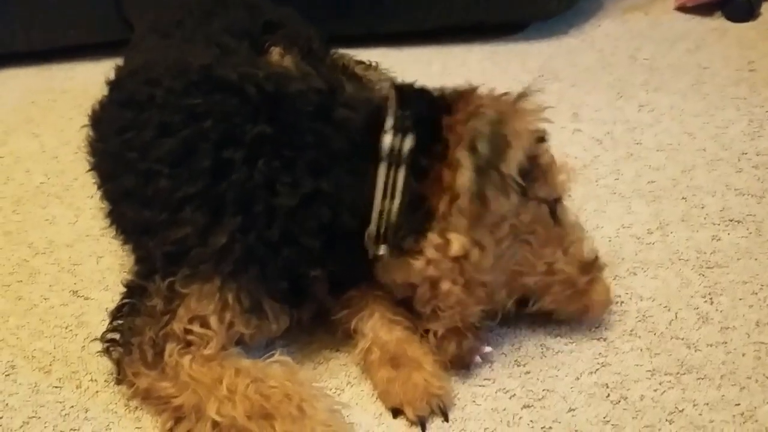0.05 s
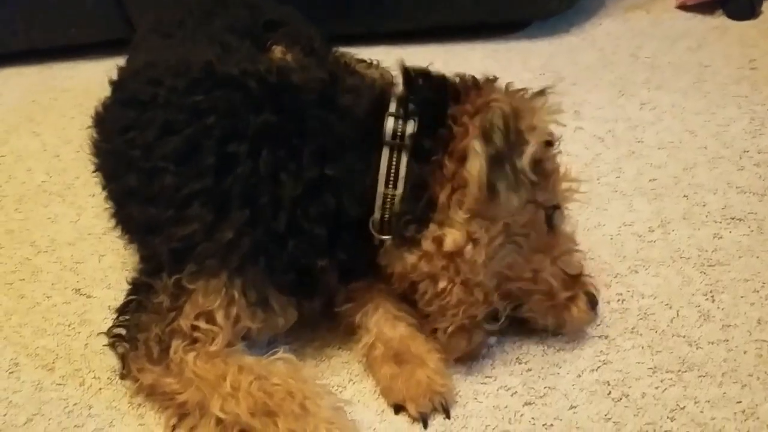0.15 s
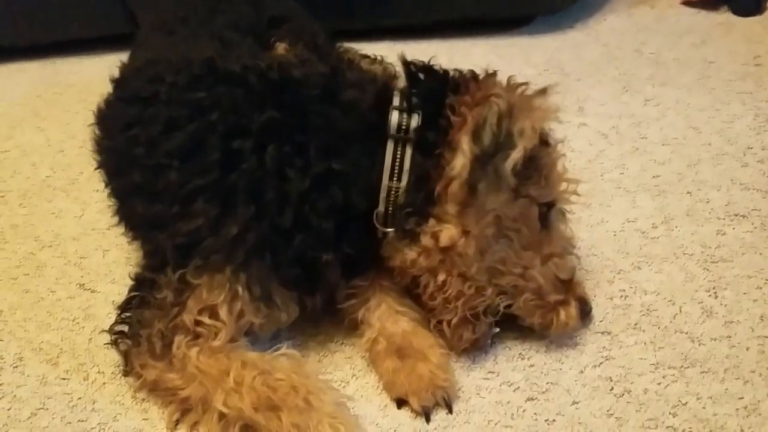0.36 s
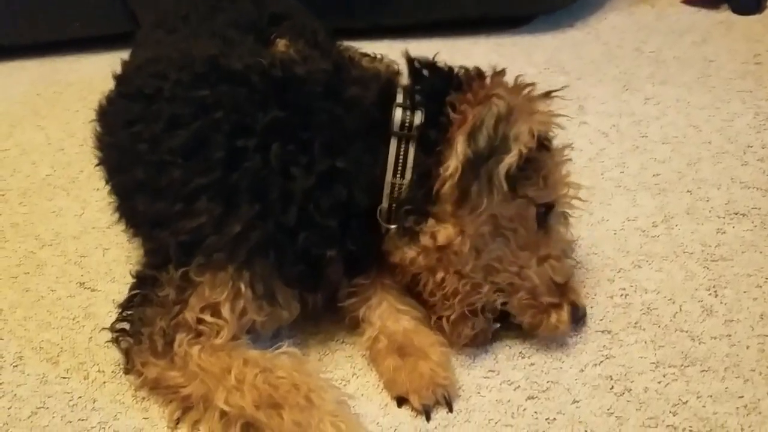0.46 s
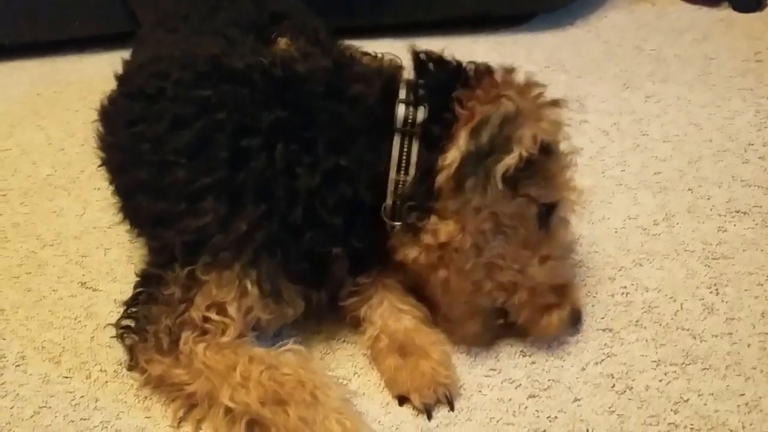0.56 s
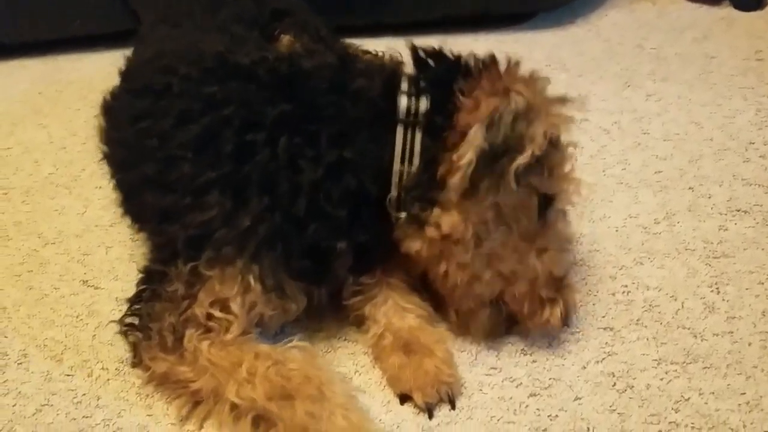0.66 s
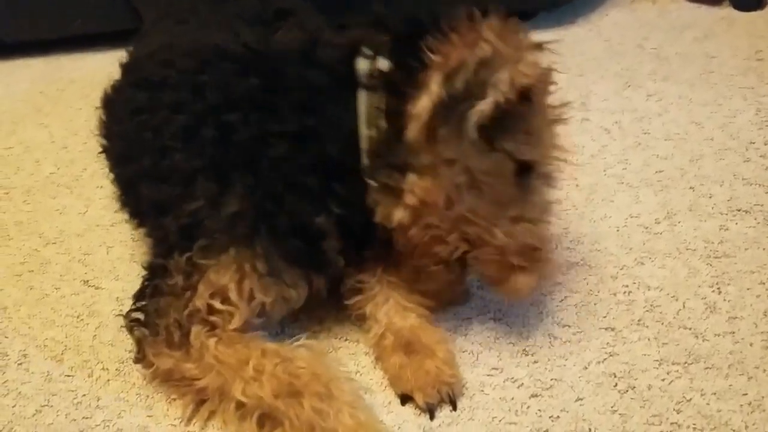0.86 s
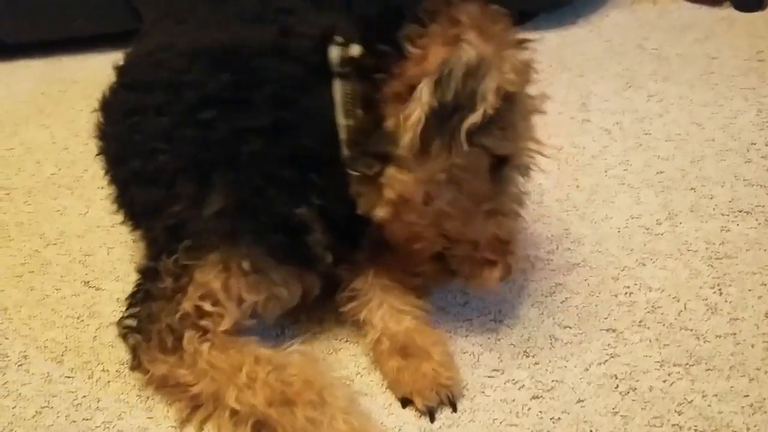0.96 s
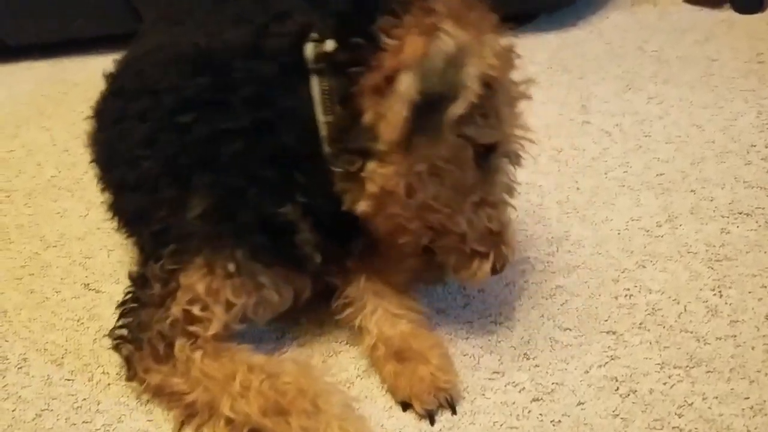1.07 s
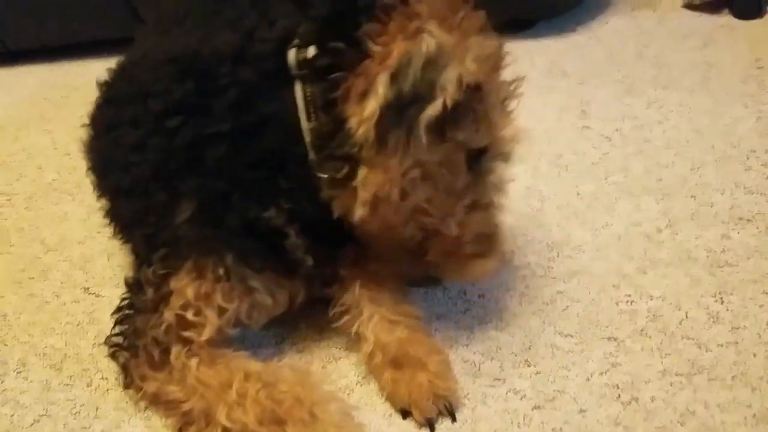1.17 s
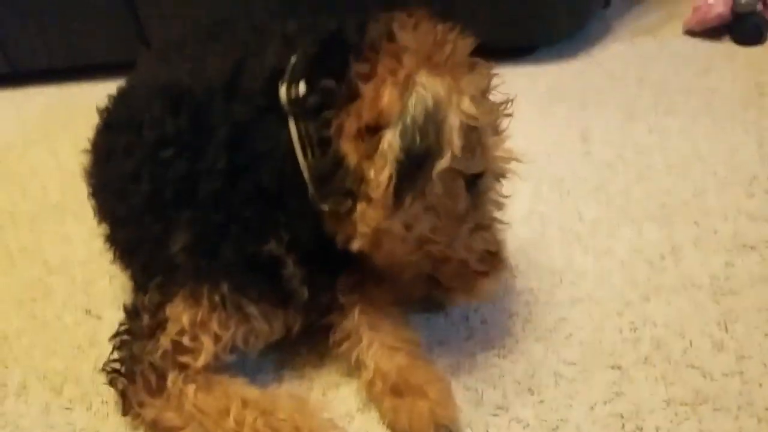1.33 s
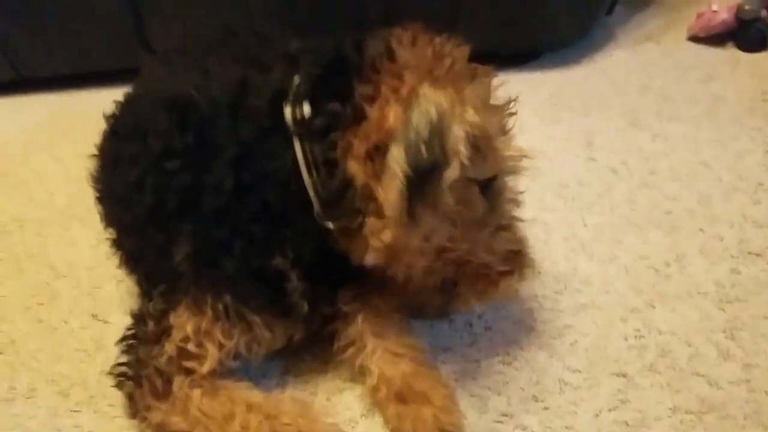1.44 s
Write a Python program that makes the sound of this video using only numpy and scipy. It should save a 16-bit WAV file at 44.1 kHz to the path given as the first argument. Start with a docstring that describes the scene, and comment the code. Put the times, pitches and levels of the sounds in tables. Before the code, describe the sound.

Dog chewing bone up close: rapid knocks and crunches, a sharp crack, then quiet mouthing

```python
"""A dog gnaws a large bone on a carpet, close to the microphone in a living room with a quiet tone.
Small wet clicks, cavity pops and swelling bands of noise (ticks, soft brushing) come first and return late.
Teeth drag and catch: damped modes knock jaw and bone, noise bursts crush it, short wavering tones squeak.
Low damped pushes with noise puffs bump on the carpet from early on and after the crack.
At half a second comes that one hard crack with a few gritty snaps; then the dog mouths the bone quietly."""
import sys
import numpy as np
from scipy import signal
from scipy.fft import rfft, irfft, next_fast_len
from scipy.io import wavfile
from scipy.ndimage import uniform_filter1d

SR = 44100
rng = np.random.default_rng(int(sys.argv[2]) if len(sys.argv) > 2 else 0)


def output_pcm(signal):
    """Save a mono or channel-first signal as 16-bit PCM at the path in sys.argv[1].

    Samples are clipped to [-1, 1] before scaling.
    """
    pcm = np.clip(np.atleast_2d(signal).T, -1, 1) * 32767
    wavfile.write(sys.argv[1], SR, np.round(pcm).astype(np.int16))


N = 66150  # 1.5 s

# In all spectra the levels shape the colour only: the noise is then scaled to rms 1.
# Room tone: (frequency [Hz], relative level [dB per Hz])
AIR_SPECTRUM = [(15, -31), (35, -42), (60, -16), (115, 1.5), (180, -11), (300, -10.5), (550, -17.5),
                (900, -16), (2000, -17.5), (7000, -30), (11000, -28.5), (15500, -25)]
AIR_DB = -66.5
# Left-right likeness of diffuse sound: (frequency [Hz], correlation [-1 to 1])
STEREO_LIKENESS = [(50, 0.96), (250, 0.78), (600, 0.22), (1500, 0.028), (12000, 0.017)]
# Decay of the room: (frequency [Hz], t60 [s])
ROOM_DECAY = [(100, 0.86), (400, 0.26), (1500, 0.32), (4000, 0.28), (14000, 0.047)]
# Strength of the room's answer: (frequency [Hz], level against the direct sound [dB])
ROOM_LEVEL = [(80, -25), (300, -13), (900, -4), (3000, -3.5), (7000, -6), (14000, -8.5)]
ROOM_BUILD_S = 0.00057  # time constant of the room's onset

# The dog shifting its weight: (time [s], level before panning [dB])
SHIFT_LEVEL = [(0, -73), (.15, -63.5), (.28, -56), (.4, -72), (.5, -60), (.58, -47.5), (.66, -54.5),
               (.73, -71), (1.5, -75.5)]
# Low rumble of that weight: (frequency [Hz], relative level [dB per Hz])
RUMBLE_SPECTRUM = [(22, -59), (31, -5), (41, 6.5), (52, -5.5), (64, 7.5), (85, -1.5), (150, -14),
                   (400, -45.5)]

# Bone and paw bumping on the carpet: (time [s], level before muffling and panning [dB], pitch [Hz])
BUMPS = [(.112, -49, 208), (0.158, -63, 155), (0.234, -46.5, 131), (0.267, -54.5, 71), (0.296, -50, 123),
         (0.325, -51, 68), (0.504, -40, 198), (0.575, -43.5, 149), (.587, -50.5, 75.5), (0.609, -56, 113),
         (.653, -44.5, 97.3), (1.399, -54, 140)]
# Dull puff of each bump: (frequency [Hz], relative level [dB per Hz])
PUFF_SPECTRUM = [(40, -6), (130, 5.5), (400, 1), (700, -12), (1500, -32)]
BUMP_T60_S, BUMP_RISE_S, BUMP_PUFF_DB = 0.026, 0.00031, -0.5  # puff level against the push
CARPET_HZ = 540  # the pile muffles more and more from here up

# Short ticks, a late knock's noise and soft brushing:
# (time [s], length [s], level before the swell [dB], centre [Hz], width [octaves])
NOISE_SWELLS = [(0.03, 0.0055, -51.5, 1870, 1.16), (0.64, 0.04, -66, 1650, 0.86),
                (0.873, 0.018, -65, 1120, 0.8), (0.937, 0.023, -64.5, 5470, 1.2),
                (1.06, 0.0056, -60.5, 11000, 0.86), (1.3977, 0.006, -54.5, 2220, 0.58),
                (1.405, 0.11, -67.5, 1190, 1.37), (1.387, 0.063, -66.5, 12400, 0.75)]
# Lip and tongue smacks: (time [s], click level [dB], cavity pop level [dB], cavity pitch [Hz])
SMACKS = [(0.08, -61.5, -54, 245), (0.875, -64.5, -63, 336), (.930, -66, -60.5, 326),
          (1.139, -67.5, -65.5, 794), (1.142, -69, -57.5, 266), (1.3969, -64, -54.5, 567)]
# Wet click: (frequency [Hz], relative level [dB per Hz])
SMACK_SPECTRUM = [(300, -2), (1200, 9), (2500, -18), (4200, -5.5), (6000, -14.5), (8000, -24),
                  (13000, -1.5), (16000, -28.5)]
SMACK_T60_S, POP_T60_S = 0.02, 0.014

# Teeth dragging between catches: (time [s], level before panning [dB])
DRAG_LEVEL = [(0, -66.5), (.06, -63), (.1, -56.5), (.135, -73), (.2, -56), (.26, -55.5), (.35, -55.5),
              (.41, -51.5), (.45, -48), (.495, -63), (.535, -42), (.6, -66.5), (.7, -73), (.9, -66.5),
              (1.15, -66.5), (1.38, -74), (1.42, -64), (1.5, -63.5)]
# Scrape of the teeth: (frequency [Hz], relative level [dB per Hz])
SCRAPE_SPECTRUM = [(60, 9.5), (200, 12.5), (420, 6.5), (650, 5.5), (950, -9.5), (1600, -15), (3800, -44),
                   (5000, -13.5), (8000, -44), (12000, -9), (16000, -57)]
SLIPS_PER_S, DRAG_ROUGH_DB = 450, 5  # rate and depth of the random gain steps

# Enamel squeaking briefly over the bone: (time [s], level [dB], pitch [Hz])
SQUEAKS = [(.109, -67, 3730), (.146, -64.5, 3670), (.155, -65.5, 3590), (.226, -58, 2344),
           (.2275, -64.5, 3840), (.364, -57.5, 3680), (.3875, -59, 2670), (.4045, -58, 2600)]
SQUEAK_S, SQUEAK_WAVER = 0.0069, 0.045  # length, rms waver as a share of the pitch

# Splinters breaking off after the hard crack: (time [s], level [dB])
SPLINTERS = [(0.5061, -46), (0.5099, -44.5), (.516, -42.5), (.536, -62)]
# Snap of a splinter: (frequency [Hz], relative level [dB per Hz])
SPLINTER_SPECTRUM = [(400, 14), (1100, 10.5), (1700, 12.5), (2600, -4.5), (3900, 2), (6000, -7), (9000, -4),
                     (12500, 3.5), (16000, 4)]
SPLINTER_T60_S = 0.0086

# Tooth catches, each level before its trim and panning: (time [s], crunch level [dB],
# jaw knock level [dB], bone knock level [dB], grit level [dB], jaw pitch [Hz], bone pitch [Hz],
# crunch and grit t60 [s])
BITES = [(0.0853, -56.5, -46, -45, -57, 288, 463, 0.015), (0.1091, -50, -45, -62, -56, 357, 850, 0.037),
         (0.148, -40, -53, -66, -53.5, 422, 1540, 0.013), (.157, -50, -48, -62, -58, 230, 1460, 0.03),
         (0.218, -45.5, -50.5, -54, -56.5, 270, 1090, 0.016),
         (0.2294, -43.5, -41.5, -43.5, -48.5, 446, 860, 0.015),
         (0.2889, -47.5, -44, -40.5, -49.5, 266, 852, 0.023),
         (0.3242, -45.5, -48, -43, -46.5, 316, 890, 0.013), (0.3645, -33, -43, -36.5, -51, 437, 912, 0.017),
         (.3688, -33.5, -43.5, -44, -69, 415, 650, .012), (.390, -38, -37.5, -47, -46.5, 432, 910, 0.03),
         (0.3952, -41, -41, -35, -45, 378, 880, 0.022), (0.406, -36.5, -34.5, -40, -46.5, 400, 880, 0.025),
         (0.4283, -34, -42, -39, -47.5, 394, 920, 0.011), (0.433, -35, -34.5, -35.5, -49, 397, 833, 0.028),
         (0.4424, -42, -41, -46.5, -51.5, 457, 1113, 0.016), (.449, -57, -50, -59, -53, 426, 1110, .013),
         (0.5012, -22.5, -26.5, -28, -35.5, 436, 761, 0.0099)]
# Upper modes of the bone, damped by lips and paws, before a small random spread:
# (frequency [Hz], level against the main mode [dB], t60 [s])
BONE_MODES = [(1237, -14.5, 0.0074), (2460, -19, 0.0067), (3820, -21.5, 0.012)]
# Bright part of crushed bone: (frequency [Hz], relative level [dB per Hz])
CRUNCH_SPECTRUM = [(3000, -8), (7000, -18), (8200, -4.5), (9300, -9), (11000, -1.5), (13000, 1), (15000, 1),
                   (16500, -46)]
# Darker part of crushed bone: (frequency [Hz], relative level [dB per Hz])
GRIT_SPECTRUM = [(300, -0.5), (1000, 15), (1700, 3), (2400, 5), (3100, -2.5), (3900, -6.5), (4600, -7.5),
                 (5800, -3), (7000, -16), (12000, -44)]
JAW_TRIM_DB, BONE_TRIM_DB, CRUNCH_TRIM_DB, GRIT_TRIM_DB = -2.5, -7.5, -13.5, -5
KNOCK_RISE_S, JAW_T60_S, BONE_T60_S = 0.0025, 0.016, 0.012
FRACTURES_PER_S, CRUNCH_ROUGH_DB = 1893, 7  # rate and depth of the random gain steps
CRUNCH_RISE = 0.25  # rise over t60: a slow crumble starts softly, a hard crack at once

# Left over right
JAW_PAN_DB, BONE_PAN_DB, CRUNCH_PAN_DB, GRIT_PAN_DB, DRAG_PAN_DB = 3.5, 11.5, 1.5, -6, 2.5
TOP_HZ, SOFT_TOP_HZ = 16800, 15850  # upper band limits of the whole mix and of the soft layers
T = np.arange(SR // 8) / SR  # clock of a short sound [s]


def amp(db):
    """Decibels to gain."""
    return 10 ** (np.asarray(db) / 20)


def unit(x):
    """Scale to rms 1."""
    return x / np.sqrt(np.mean(x ** 2) + 1e-20)


def blow(x):
    """Scale a short sound to the energy of 10 ms at rms 1."""
    return unit(x) * np.sqrt(.01 * SR / x.shape[-1])


def along(points, hz):
    """Read (frequency [Hz], value) points on a log frequency axis."""
    f, v = np.transpose(points)
    return np.interp(np.log(hz + 1), np.log(f + 1), v)


def level(points):
    """Gain per sample from (time [s], level [dB]) points."""
    return amp(np.interp(np.arange(N) / SR, *np.transpose(points)))


def pan(db):
    """Left and right gains, db apart."""
    return amp(np.array([[db], [-db]]) / 2)


def filtered(x, response):
    """Shape x with a gain that depends on frequency."""
    n = x.shape[-1]
    m = next_fast_len(n + 8192)
    spectrum = rfft(x, m) * response(np.fft.rfftfreq(m, 1 / SR))
    return irfft(spectrum, m)[..., :n]


def noise(spectrum, size):
    """Coloured stereo noise of rms 1, most alike left and right in the bass."""
    def mid_side_gain(hz):
        angle = np.arccos(np.clip(along(STEREO_LIKENESS, hz), -1, 1)) / 2
        return amp(along(spectrum, hz)) * [np.cos(angle), np.sin(angle)]

    mid, side = filtered(rng.standard_normal((2, size)), mid_side_gain)
    return unit(np.array([mid + side, mid - side]))


def fade(rise, t60):
    """Quick rise, exponential decay."""
    return (1 - np.exp(-T / rise)) * np.exp(-np.log(1000) * T / t60)


def ring(hz, rise, t60):
    """One damped mode of a struck body."""
    return np.sin(2 * np.pi * hz * T) * fade(rise, t60)


def grain(rate, depth_db, size):
    """A jagged random gain of rms 1."""
    knots = np.sqrt(3) * rng.uniform(-1, 1, size)  # rms 1
    steps = np.interp(np.arange(size) * rate / SR, np.arange(size), knots)
    return unit(amp(depth_db * steps))


def burst(spectrum, t60):
    """A dying cluster of tiny fractures: coloured noise with a jagged gain."""
    dying = noise(spectrum, len(T)) * fade(CRUNCH_RISE * t60, t60)
    return blow(dying * grain(FRACTURES_PER_S, CRUNCH_ROUGH_DB, len(T)))


def add(out, s, x):
    """Mix x in at time s."""
    part = out[:, max(round(s * SR), 0):][:, :x.shape[-1]]
    part += x[..., :part.shape[1]]


def in_room(x):
    """A short sound followed by the room's answer: noise whose decay depends on frequency."""
    flat_noise = noise([(20, 0), (20000, 0)], SR // 2)
    hz, t, bands = signal.stft(flat_noise, SR, nperseg=256)
    t60 = along(ROOM_DECAY, hz)[:, None]
    shape = np.exp(-np.log(1000) * t / t60) * (1 - np.exp(-t / ROOM_BUILD_S))
    # even energy in every band, so that ROOM_LEVEL alone sets the strength
    shape = shape / np.sqrt(np.mean(shape ** 2, axis=1, keepdims=True) * SR / 2)
    wet = amp(along(ROOM_LEVEL, hz))[:, None]
    response = signal.istft(bands * shape * wet, SR, nperseg=256)[1]
    response[:, 0] += 1  # the direct sound
    return signal.fftconvolve(x * np.ones((2, 1)), response, axes=1)


def room_tone():
    """Steady, quiet noise of the air in the room."""
    return amp(AIR_DB) * noise(AIR_SPECTRUM, N)


def weight_shifts():
    """The dog shifts on the floor: low noise rises and falls with its weight."""
    return level(SHIFT_LEVEL) * noise(RUMBLE_SPECTRUM, N) * pan(DRAG_PAN_DB)


def carpet_bumps():
    """Each bump is a low damped push and a dull puff, muffled by the carpet."""
    out = np.zeros((2, N))
    for s, db, hz in BUMPS:
        push = blow(ring(hz, BUMP_RISE_S, BUMP_T60_S))
        puff = amp(BUMP_PUFF_DB) * burst(PUFF_SPECTRUM, BUMP_T60_S)
        muffled = filtered(push + puff, lambda f: 1 / np.sqrt(1 + (f / CARPET_HZ) ** 6))
        add(out, s, in_room(amp(db) * muffled * pan(JAW_PAN_DB)))
    return out


def noise_swells():
    """Short ticks, a late knock's noise and soft brushing: swelling bands of grainy noise."""
    out = np.zeros((2, N))
    t = np.arange(SR // 4) / SR
    for s, length, db, hz, octaves in NOISE_SWELLS:
        hiss = noise([(20, 0.0033), (20000, 0.0038)], len(t))  # practically flat
        band = filtered(hiss, lambda f: np.exp(-.5 * (np.log2((f + 1) / hz) / octaves) ** 2))
        swell = np.sin(np.pi * np.minimum(t / length, 1))
        grainy = unit(band) * swell * grain(SLIPS_PER_S, DRAG_ROUGH_DB, len(t))
        add(out, s, in_room(amp(db) * grainy))
    return out


def smacks():
    """Lips and tongue part with a wet noise click and a damped pop of the mouth cavity."""
    out = np.zeros((2, N))
    for s, click_db, pop_db, hz in SMACKS:
        click = amp(click_db) * burst(SMACK_SPECTRUM, SMACK_T60_S)
        pop = amp(pop_db) * blow(ring(hz, KNOCK_RISE_S, POP_T60_S))
        add(out, s, in_room(click + pop))
    return out


def tooth_drag():
    """Teeth drag over the bone in tiny slips: scraping noise with a jagged gain."""
    scrape = noise(SCRAPE_SPECTRUM, N) * grain(SLIPS_PER_S, DRAG_ROUGH_DB, N)
    return level(DRAG_LEVEL) * scrape * pan(DRAG_PAN_DB)


def squeaks():
    """Enamel slides over the bone: a brief tone of unsteady pitch swells and fades."""
    out = np.zeros((2, N))
    swell = np.sin(np.pi * np.minimum(T / SQUEAK_S, 1))
    for s, db, hz in SQUEAKS:
        waver = unit(uniform_filter1d(rng.standard_normal(len(T)), size=30))
        pitch = hz * (1 + SQUEAK_WAVER * waver)
        tone = np.sin(2 * np.pi * np.cumsum(pitch) / SR)
        add(out, s, in_room(amp(db) * blow(tone * swell)))
    return out


def splinters():
    """The hard crack runs on in a few gritty snaps, each a short fracture burst."""
    out = np.zeros((2, N))
    for s, db in SPLINTERS:
        add(out, s, in_room(amp(db) * burst(SPLINTER_SPECTRUM, SPLINTER_T60_S)))
    return out


def bone_knock(main_hz):
    """The bone rings in its main mode and in upper modes that vary a little from knock to knock."""
    knock = ring(main_hz, KNOCK_RISE_S, BONE_T60_S)
    for hz, db, t60 in BONE_MODES:
        gain = amp(db + rng.normal(0, 0.99))
        knock = knock + gain * ring(hz * np.exp(rng.normal(0, 0.018)), KNOCK_RISE_S, t60)
    return blow(knock)


def bites():
    """Each catch of a tooth knocks jaw and bone and crushes the surface; the grip sets the pitches."""
    out = np.zeros((2, N))
    for s, crunch_db, jaw_db, bone_db, grit_db, jaw_hz, bone_hz, crunch_t60 in BITES:
        jaw = amp(jaw_db + JAW_TRIM_DB) * blow(ring(jaw_hz, KNOCK_RISE_S, JAW_T60_S))
        bone = amp(bone_db + BONE_TRIM_DB) * bone_knock(bone_hz)
        crunch = amp(crunch_db + CRUNCH_TRIM_DB) * burst(CRUNCH_SPECTRUM, crunch_t60)
        grit = amp(grit_db + GRIT_TRIM_DB) * burst(GRIT_SPECTRUM, crunch_t60)
        knocks = jaw * pan(JAW_PAN_DB) + bone * pan(BONE_PAN_DB)
        crushing = crunch * pan(CRUNCH_PAN_DB) + grit * pan(GRIT_PAN_DB)
        add(out, s, in_room(knocks + crushing))
    return out


def scene():
    """The dog over a quiet room tone; the soft layers stop sharply at their own band limit."""
    soft = room_tone() + weight_shifts() + noise_swells() + smacks() + tooth_drag()
    soft = filtered(soft, lambda hz: hz < SOFT_TOP_HZ)
    return soft + carpet_bumps() + squeaks() + splinters() + bites()


def record(dry):
    """A very steep low-pass closes the top of the band."""
    return filtered(dry, lambda hz: 1 / np.sqrt(1 + (hz / TOP_HZ) ** 200))


dry = scene()
out = record(dry)
output_pcm(out)
```